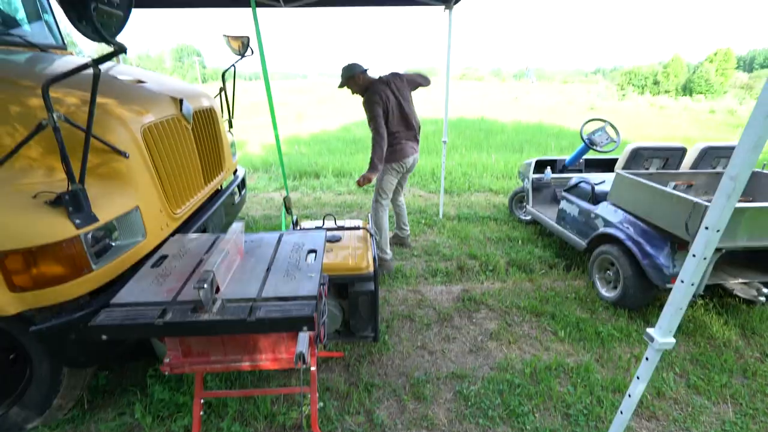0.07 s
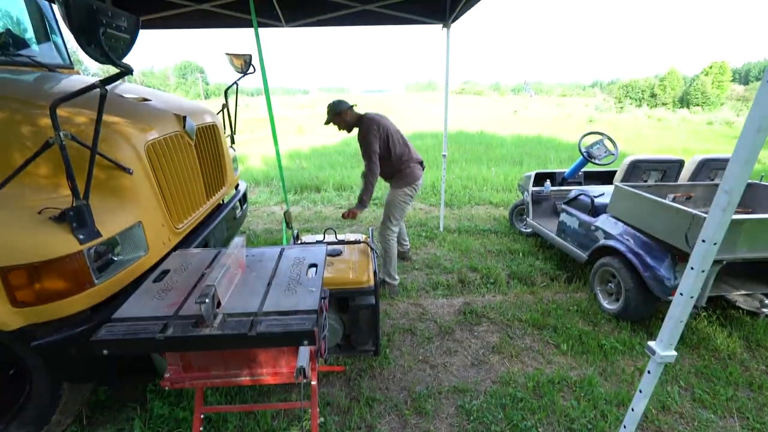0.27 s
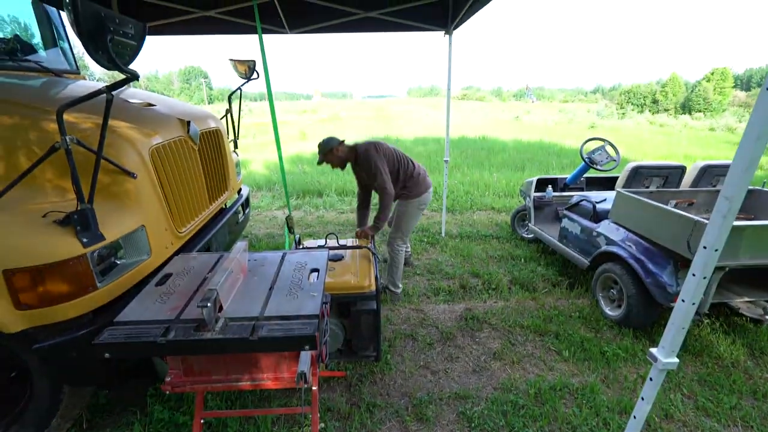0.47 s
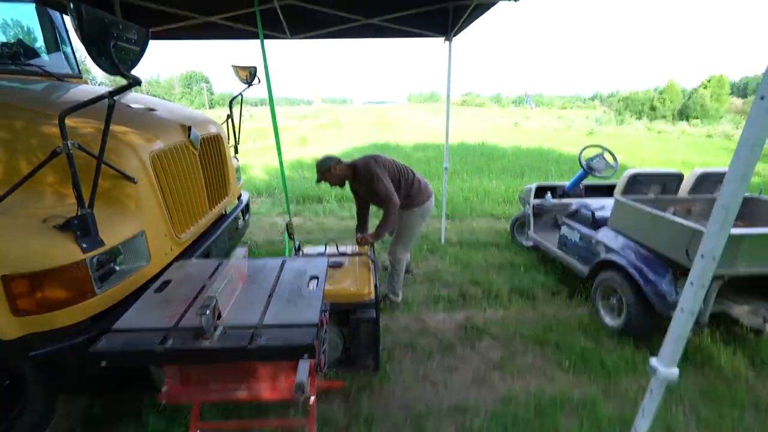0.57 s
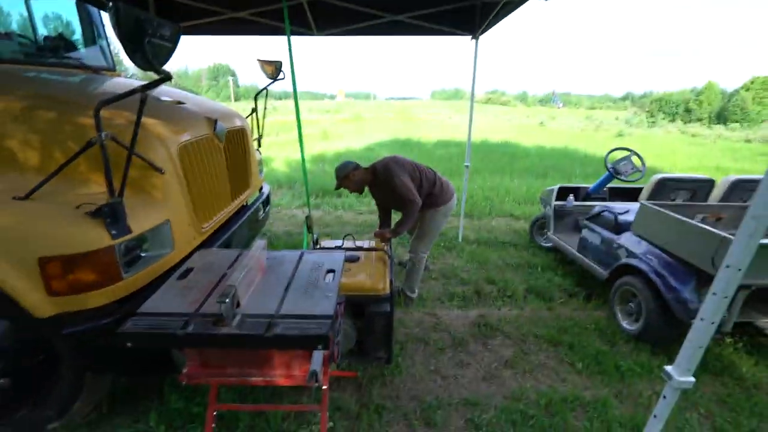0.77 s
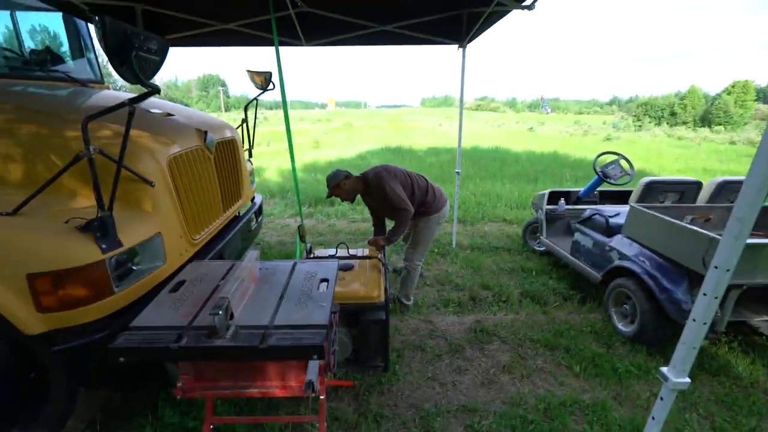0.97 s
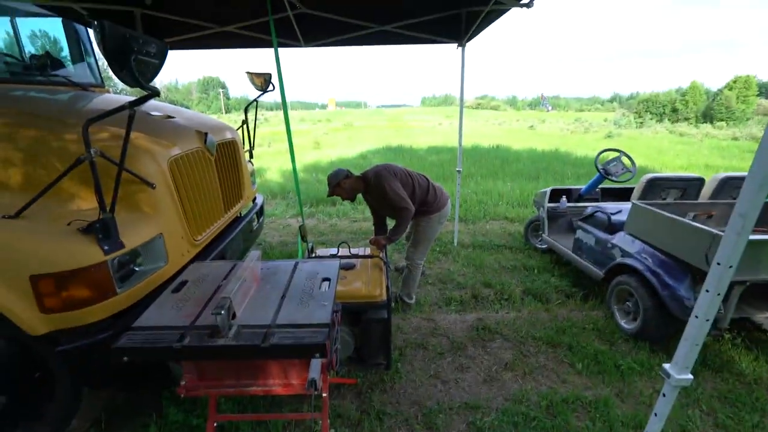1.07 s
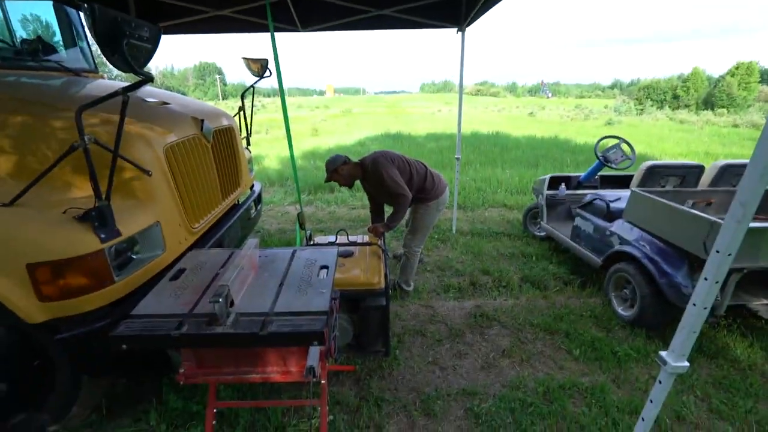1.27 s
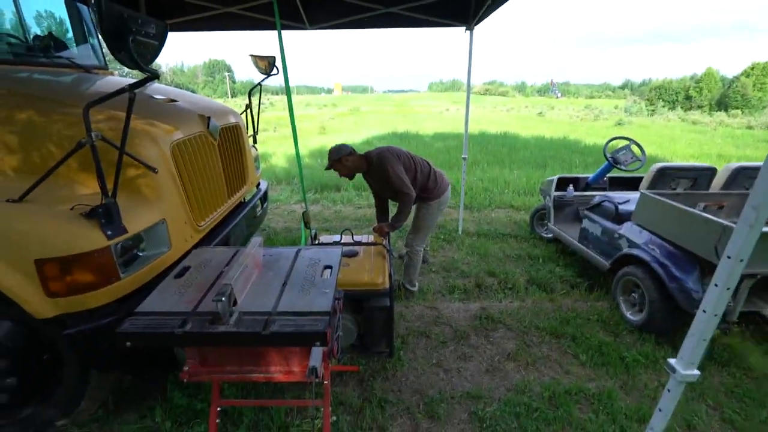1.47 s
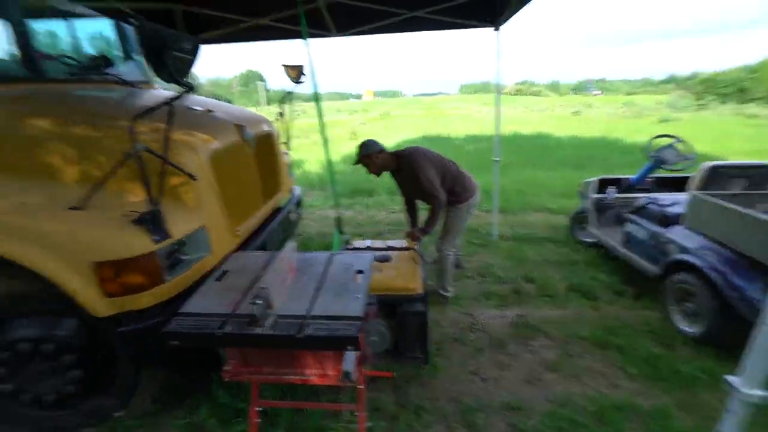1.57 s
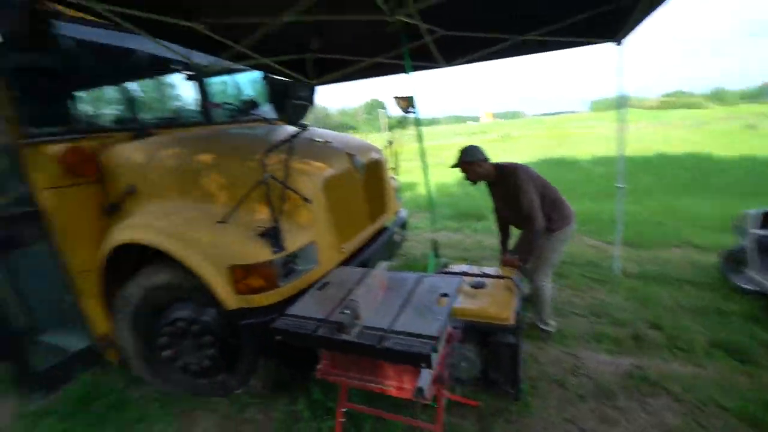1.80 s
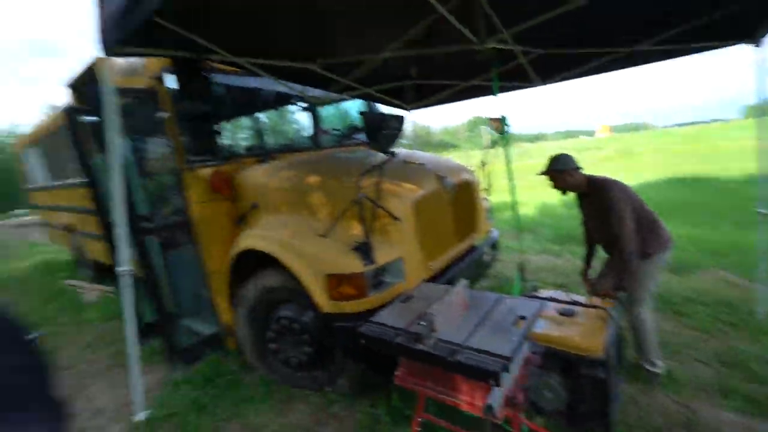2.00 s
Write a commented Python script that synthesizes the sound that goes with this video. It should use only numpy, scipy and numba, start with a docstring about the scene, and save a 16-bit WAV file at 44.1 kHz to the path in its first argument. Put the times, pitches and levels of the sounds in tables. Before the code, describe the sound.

A small petrol generator sputters up to speed outdoors, its sheet metal clanking and rattling fast.

```python
"""Sheet metal clanks hard about once an engine cycle, then softly: a small petrol generator, just
pull-started in a field a few metres away, sputters up to speed. The muffler thumps quietly below.
Each clank is a noisy rattle that crashes broadly and excites the sheet's modes, with a short tail of echoes.
The thumps are impulses into low resonances; a mechanical rush is coloured noise beating with the cycle."""
import sys
import numpy as np
from scipy import signal
from scipy.fft import rfft, irfft
from scipy.io import wavfile
from scipy.ndimage import uniform_filter1d
from numba import njit

SR = 44100
rng = np.random.default_rng(int(sys.argv[2]) if len(sys.argv) > 2 else 0)


def generate_wav(sig):
    """Save sig (samples, or channels by samples) to the path in sys.argv[1] as 16-bit PCM at SR."""
    pcm = np.round(np.clip(np.atleast_2d(sig).T, -1, 1) * 32767).astype(np.int16)
    wavfile.write(sys.argv[1], SR, pcm)


N = 90096

# engine cycles completed: time_s, count_cycles
ENGINE_CYCLES = [(0.082, 0), (0.317, 3), (0.603, 7), (0.885, 11), (1.088, 14), (1.209, 16), (1.379, 19),
                 (1.538, 22), (1.705, 25), (1.831, 27), (2.033, 30), (2.1, 31)]
# strength of the three muffler thumps of a cycle: time_s, first_db, second_db, third_db
THUMP_LEVELS = [(0.07, -42.5, -43, -49), (0.5, -44.5, -46, -55), (0.852, -42.5, -41.5, -66),
                (0.998, -44, -44, -63), (1.1, -36.5, -37.5, -52), (1.38, -43.5, -36, -57),
                (1.43, -43.5, -65, -61), (1.75, -52, -68, -58), (2.04, -45, -60, -58)]
# resonances of the muffler: pitch_hz, level_db, t60_s
MUFFLER_MODES = [(124, -8.5, 0.039), (232.4, 1.5, 0.071), (343, -16, 0.011)]
# clanks, levels relative: start_s, level_db, middle_ring_hz, middle_lift_db, upper_ring_hz, upper_lift_db,
# low_ring_db, thud_db, treble_db, rattle_length_s
CLANK_EVENTS = [(0.0645, -13, 1687, 21.5, 3062, 37.5, -2, 16, 28.5, 0.013),
                (0.117, -9, 1575, 22, 3080, -10, 6.5, 14, -1.5, 0.005),
                (0.128, -9, 1927, 15, 2740, 17, 7, 7.5, 11, 0.005),
                (0.1706, -16.5, 1690, 19, 2720, -7, -1, 22, 4, 0.0094),
                (0.2088, -9, 2320, 17.5, 3730, 13, -4, -11, 11.5, 0.014),
                (0.3047, -24, 1970, 9, 3420, -17, 3, 16, -2, 0.036),
                (0.3673, -7.5, 2310, 16, 3710, 11, 9, -8, 7, 0.011),
                (0.4545, -24, 1916, 25, 2930, 13, 17, 18, -14, 0.014),
                (0.5082, -7.5, 2110, 14.5, 3200, 9, 5.5, -23, 6.5, 0.013),
                (0.5956, -27.5, 2160, -3, 3530, 8, -4, 3, 6, 0.031),
                (0.6506, -6.5, 2230, -1.5, 4036, 7, -1, -14, 3, 0.0071),
                (0.7305, -10, 2470, 12, 3230, 0, 3.5, 12, -0.5, 0.023),
                (0.788, -8.5, 2370, 7, 3460, 14.5, -1, 0, 7, 0.005),
                (0.8784, -26, 2000, 25, 2900, 12, 14, 0, 0, 0.016),
                (0.9317, -7, 1903, 13, 3684, 13, -0.5, -3, 8, 0.0085),
                (1.0154, -23.5, 2140, 14, 3480, 7, 16, 3, 4, 0.018),
                (1.0647, -6.5, 2160, 7, 3520, 5.5, 3, -4, 4.5, 0.0062),
                (1.1263, -7.5, 2100, -8, 3540, 0, 11.5, -7, 3.5, 0.016),
                (1.1868, -6.5, 2020, -21, 3340, 16.5, -19, -14, 7, 0.0075),
                (1.2462, -8.5, 2680, 11, 3350, 18.5, 13, -3, 10, 0.0063),
                (1.3159, -25, 2275, 9, 3670, -1, -19, 18, -1, 0.0086),
                (1.357, -8.5, 2190, 2, 3960, 14, 8, -11, 5.5, 0.0097),
                (1.4262, -26, 2300, 10, 3010, -8, 18, 24.5, -5, 0.015),
                (1.475, -22, 2270, -2, 2800, 6, 14, 12.5, -14, 0.022),
                (1.529, -17, 2070, 7, 3360, 13, 13, 10.5, -29, 0.0086),
                (1.5857, -19.5, 1840, 32, 3250, 4, 8, 10.5, -15, 0.011),
                (1.6427, -18, 2560, 0, 3140, 9, -3, 12, -11, 0.0078),
                (1.7002, -23, 1840, 18, 2760, 19.5, 2, 17, 3.5, 0.013),
                (1.7639, -22, 1970, 5, 2750, 15, 7, 3, -1, 0.0097),
                (1.8236, -22.5, 1999, 22.5, 2680, 15, 6, 16, -8, 0.02),
                (1.8792, -17, 1950, 18, 2680, 27, -3, 11, 6, 0.0098),
                (1.9577, -28.5, 1973, 16, 2750, 17, 3, 12, 7, 0.022),
                (2.032, -24.5, 1970, 18, 2740, 20, 19, 18, -2, 0.01)]
# modes of the sheet metal, levels relative: pitch_hz, level_db, t60_s
SHEET_MODES = [(734, -28, 0.13), (850, -27, 0.088), (1084, -19.5, 0.23), (1196, -16, 0.22),
               (1266, -14.5, 0.21), (1482, -13.5, 0.074), (1718.6, -20.5, 0.21), (1956, -13.5, 0.074),
               (2259, -12, 0.054), (2350, -17, 0.13), (2780, -19.5, 0.14), (2989, -20, 0.29),
               (3141, -26.5, 0.12), (3528, -12.5, 0.04), (4004, -16, 0.056), (4790, -19, 0.04)]
# relative spectral density of the crash: frequency_hz, density_db
CRASH_SPECTRUM = [(240, -86), (400, -16), (607, -78.5), (1200, -3.5), (1350, -12.5), (2250, -2.5),
                  (2510, -3.5), (3930, -6), (4240, -5.5), (16000, -28)]
# relative spectral density of the rush: frequency_hz, density_db
RUSH_SPECTRUM = [(18, -57), (30, -28), (118, -9.5), (170, -16), (227, -11), (400, -9.5), (600, -11.5),
                 (720, -6), (1040, 3), (1590, -1), (1960, -1), (2540, -7), (3400, -10.5), (4420, -10.5),
                 (13000, -22), (16000, -29)]
# level of the rush, about which it beats: time_s, level_db
RUSH_LEVELS = [(0.25, -31.5), (0.976, -35.5), (1.186, -36.5), (1.814, -35), (1.93, -35.5), (2.04, -39)]
# gain of the side signal: frequency_hz, gain_db
SIDE_SPECTRUM = [(60, -15), (110, -27), (200, -71), (380, -14.5), (700, -10), (1290, -11), (2380, -7.5),
                 (4400, -3.5), (8120, -1.5), (15000, -3)]
# extra gain of left over right: frequency_hz, left_over_right_db
LEAN_SPECTRUM = [(60, -3), (110, 1), (200, -2.5), (380, 1), (700, -1), (1290, -0.5), (2380, -4.5),
                 (4400, -1), (8120, -4), (15000, 1.5)]

START_S = 0.0695  # silence before this
BASS_CUT_HZ, TOP_HZ = 99, 15650
RUSH_RING_DB, RUSH_PULSE_DB, RUSH_BEAT_TURN = -27, 2, 0.07  # sheet hum, beat depth, beat peak in cycles
THUMP_RISE_S, THUMP_SCATTER_DB = 0.00398, 1.5  # lead of each impulse, random spread
TAIL_DB, TAIL_T60_S = -11.5, 0.38

CLANK_GAIN_DB = -11.5
ATTACK_S, RATTLE_T60_S = 0.0032, 0.13
GRIT_DB, GRIT_S = 2, 0.0015  # rms unevenness of the rattle and its smoothing time
TREBLE_HZ, TREBLE_T60_S, TREBLE_HOLD = 4630, 0.15, 0.7  # hold: share of the rattle length
CRASH_LIFT, CRASH_LIFT_OCT = 0.62, 0.18  # share of a ring's lift that also colours the crash, and its width
PATCHY_DB, PATCHY_HZ = 3, 359  # uneven colour of each clank and its smoothing width
THUD_HZ, THUD_DB, THUD_OCT = 513, -21, 0.98
RING_DB, FAVOUR_OCT, MODE_SCATTER_DB = -13.5, 0.039, 2.5  # sheet level, width of a lift, random spread
LOW_RING_HZ, LOW_RING_OCT = 1217, 0.15
SHEET_CUT_HZ = 645


def undb(db):
    """Decibels express amplitude ratios logarithmically; return the linear gain."""
    return 10 ** (np.asarray(db) / 20)


def unit(x):
    """Root-mean-square normalisation: scale to rms 1."""
    return x / np.sqrt(np.mean(x ** 2))


def curve_db(table, size):
    """Logarithmic frequency interpolation: read a (Hz, dB) table at every transform bin."""
    hz, db = np.array(table, float).T
    bins = np.fft.rfftfreq(size, 1 / SR) + 1
    return np.interp(np.log(bins), np.log(hz), db)


def colour(x, db):
    """Linear filtering multiplies the spectrum by a gain per bin."""
    return irfft(rfft(x) * undb(db), x.shape[-1])


def near(hz, centre, octaves):
    """Gaussian resonance weighting on a logarithmic frequency axis, 1 at the centre."""
    return np.exp(-(np.log2(hz / centre) / octaves) ** 2)


@njit
def ring(x, hz, t60):
    """Modal resonance: a driven, exponentially decaying sinusoid, here a rotating complex state."""
    radius = np.exp(-np.log(1000) / (t60 * SR))
    pole = radius * np.exp(2j * np.pi * hz / SR)
    state = 0j
    y = np.empty(len(x))
    for i in range(len(x)):
        state = state * pole + x[i]
        y[i] = state.imag
    return y


def struck_sheet(force, gains_db, detune):
    """Modal superposition: mid and side forces drive the sheet; each mode has the rms its gain sets."""
    out = 0
    for (hz, _, t60), gain_db, ratio in zip(SHEET_MODES, gains_db, detune):
        mode = np.array([unit(ring(x, hz * ratio, t60)) for x in force])
        out = out + undb(gain_db) * mode
    low_cut = signal.butter(4, SHEET_CUT_HZ, "high", fs=SR, output="sos")
    return signal.sosfilt(low_cut, out)


def rush(cycles, t):
    """Amplitude modulation: fan and valve-gear noise beats with the cycle and keeps the sheet humming."""
    force = rng.standard_normal((2, N))
    hum = unit(struck_sheet(force, np.array(SHEET_MODES)[:, 1], np.ones(len(SHEET_MODES))))
    noise = unit(colour(force, curve_db(RUSH_SPECTRUM, N)))
    time_s, level_db = np.array(RUSH_LEVELS).T
    beat_db = RUSH_PULSE_DB * np.cos(2 * np.pi * (cycles - RUSH_BEAT_TURN))
    return (noise + undb(RUSH_RING_DB) * hum) * undb(np.interp(t, time_s, level_db) + beat_db)


def muffler(cycles, t):
    """Impulse response of resonators: three low thumps a cycle, each of its own strength."""
    thirds = np.floor(3 * cycles)
    k = np.flatnonzero(np.diff(thirds) > 0)
    which = thirds[k + 1].astype(int) % 3
    table = np.array(THUMP_LEVELS)
    levels_db = np.array([np.interp(t[k], table[:, 0], table[:, c]) for c in range(1, 4)])
    thump_db = levels_db[which, np.arange(len(k))] + THUMP_SCATTER_DB * rng.standard_normal(len(k))
    push = np.zeros(N)
    push[k - int(THUMP_RISE_S * SR)] = undb(thump_db)
    return sum(undb(db) * ring(push, 1. * hz, 1. * t60) for hz, db, t60 in MUFFLER_MODES)


def echoes(x):
    """Diffuse reverberation off nearby vehicles: the mid convolved with exponentially decaying noise."""
    t = np.arange(SR // 2) / SR
    tail = rng.standard_normal((2, len(t))) * undb(-60 * t / TAIL_T60_S)
    tail *= undb(TAIL_DB) / np.sqrt(np.sum(tail ** 2) / 2)
    return signal.fftconvolve(x[:1], tail, axes=1)[:, :N]


def rattle_envelope(t, hold_s, t60):
    """Exponential decay of a contact force: a quick linear rise, a hold, then the decay."""
    decay_s = np.maximum(t - ATTACK_S - hold_s, 0)
    return np.minimum(t / ATTACK_S, 1) * undb(-60 * decay_s / t60)


def clanks():
    """Impact excitation: gritty rattles crash broadly, treble on its own decay, and ring the sheet."""
    size = 16384  # samples given to each clank
    out = np.zeros((2, N + size))
    t = np.arange(size) / SR
    bins = np.fft.rfftfreq(size, 1 / SR) + 1  # 1 Hz up, to keep logarithms finite
    mode_hz, mode_db = np.array(SHEET_MODES)[:, 0], np.array(SHEET_MODES)[:, 1]
    crash_db = curve_db(CRASH_SPECTRUM, size)
    treble = 1 / (1 + (TREBLE_HZ / bins) ** 4)  # share of each bin that counts as treble

    for start, level, mid_hz, mid_db, up_hz, up_db, low_db, thud_db, treble_db, hold in CLANK_EVENTS:
        grit_noise = uniform_filter1d(rng.standard_normal(size), int(GRIT_S * SR))
        grit = undb(GRIT_DB * unit(grit_noise))
        noise = rng.standard_normal((2, size))
        rattle = noise * grit * rattle_envelope(t, hold, RATTLE_T60_S)
        fizz = noise * grit * rattle_envelope(t, TREBLE_HOLD * hold, TREBLE_T60_S)

        lift_db = mid_db * near(bins, mid_hz, CRASH_LIFT_OCT) + up_db * near(bins, up_hz, CRASH_LIFT_OCT)
        patches = uniform_filter1d(rng.standard_normal(len(bins)), int(PATCHY_HZ * size / SR))
        patchy_db = PATCHY_DB * unit(patches)
        gain = unit(undb(crash_db + CRASH_LIFT * lift_db + treble_db * treble + patchy_db))
        gain = gain + undb(THUD_DB + thud_db) * near(bins, THUD_HZ, THUD_OCT)
        crash = irfft(gain * (rfft(rattle) * (1 - treble) + rfft(fizz) * treble), size)
        crash[:, size // 2:] = 0  # discard what wraps round the transform

        scatter, detune = rng.standard_normal((2, len(mode_hz)))
        gains_db = mode_db + MODE_SCATTER_DB * scatter
        gains_db += mid_db * near(mode_hz, mid_hz, FAVOUR_OCT) + up_db * near(mode_hz, up_hz, FAVOUR_OCT)
        gains_db += low_db * near(mode_hz, LOW_RING_HZ, LOW_RING_OCT)
        gains_db += thud_db * (mode_hz < 900)  # the thud also drives the lowest modes
        rung = struck_sheet(rattle, gains_db, 1 + 0.001 * detune)

        i = int(start * SR)
        out[:, i:i + size] += undb(level + CLANK_GAIN_DB) * (crash + undb(RING_DB) * rung)
    return out[:, :N]


def scene():
    """Superposition of sources in mid and side, decoded to left and right; all cuts in at once."""
    t = np.arange(N) / SR
    time_s, count = np.array(ENGINE_CYCLES).T
    # the count steps from 0 to 1 at the first time, so that a first thump sounds there
    cycles = np.interp(t, time_s, count + 1) - (t < time_s[0])
    hits = clanks()
    mid, side = hits + echoes(hits) + rush(cycles, t)
    mid = mid + muffler(cycles, t)
    side = colour(side, curve_db(SIDE_SPECTRUM, N))
    half_lean_db = curve_db(LEAN_SPECTRUM, N) / 2
    left = colour(mid + side, half_lean_db)
    right = colour(mid - side, -half_lean_db)
    return np.array([left, right]) * np.clip((t - START_S) / .002, 0, 1)


def record(dry):
    """Band limiting: a high-pass thins the bass and a steep low-pass cuts the top."""
    bass_cut = signal.butter(2, BASS_CUT_HZ, "high", fs=SR, output="sos")
    top_cut = signal.ellip(10, .2, 80, TOP_HZ, fs=SR, output="sos")
    return signal.sosfilt(top_cut, signal.sosfilt(bass_cut, dry))


dry = scene()
out = record(dry)
generate_wav(out)
```